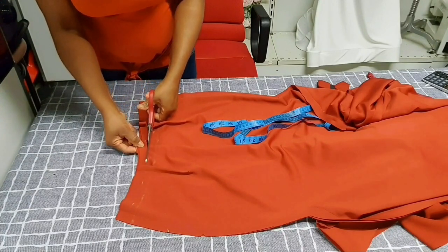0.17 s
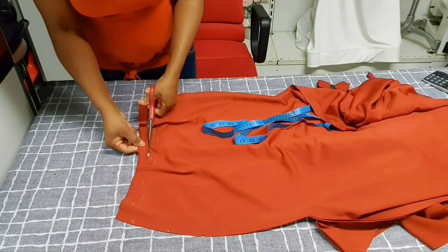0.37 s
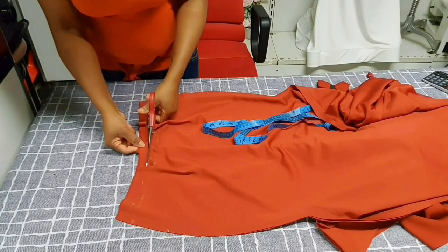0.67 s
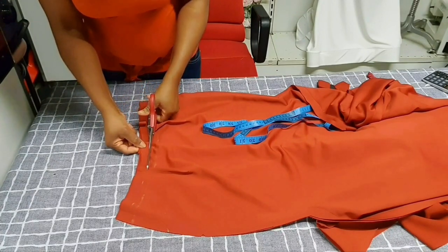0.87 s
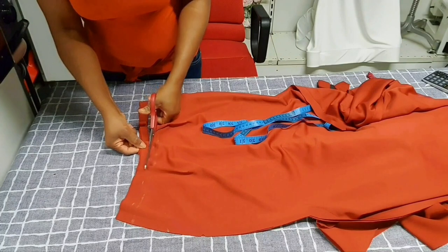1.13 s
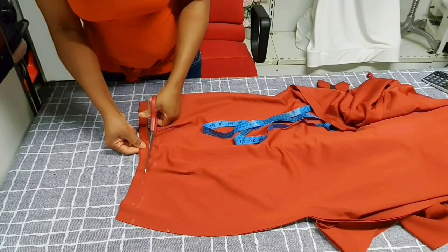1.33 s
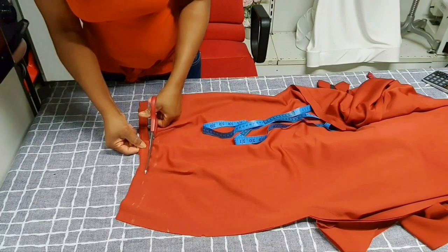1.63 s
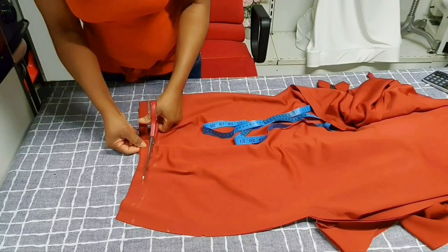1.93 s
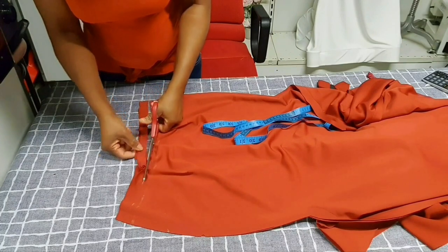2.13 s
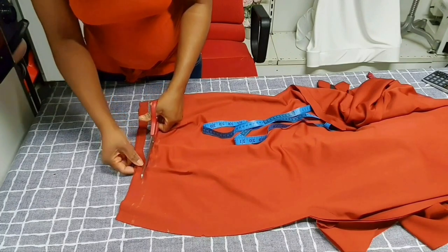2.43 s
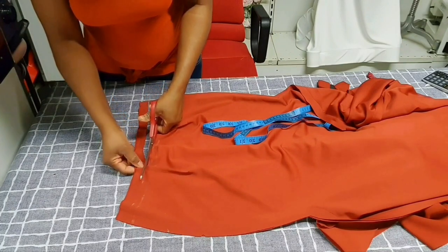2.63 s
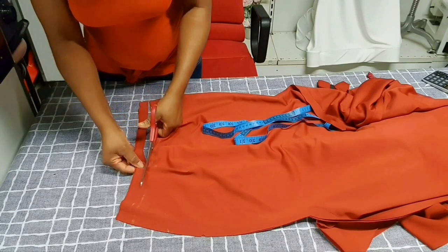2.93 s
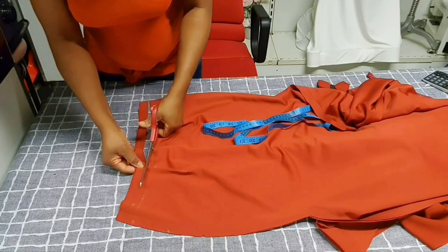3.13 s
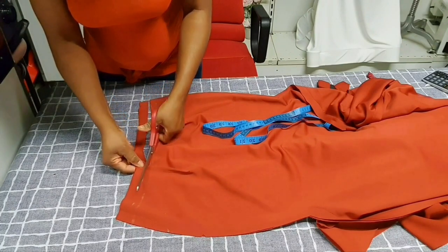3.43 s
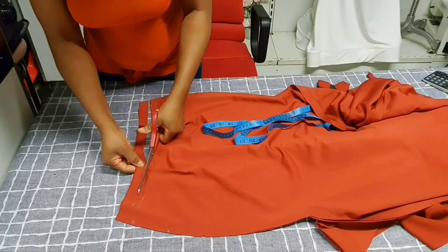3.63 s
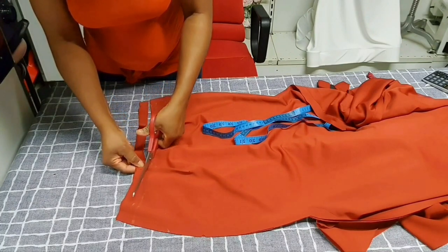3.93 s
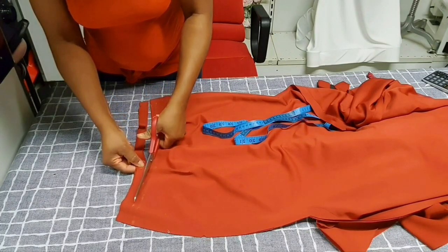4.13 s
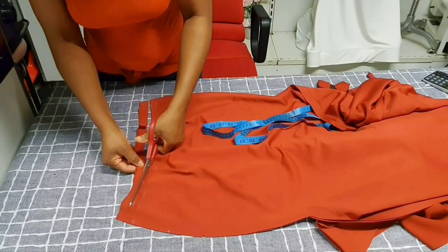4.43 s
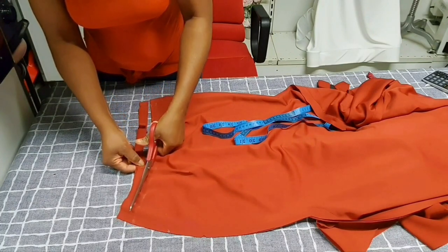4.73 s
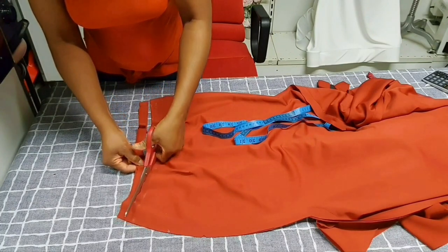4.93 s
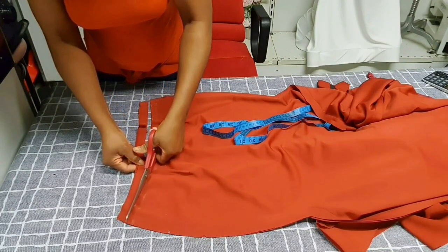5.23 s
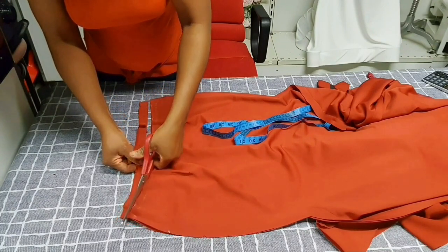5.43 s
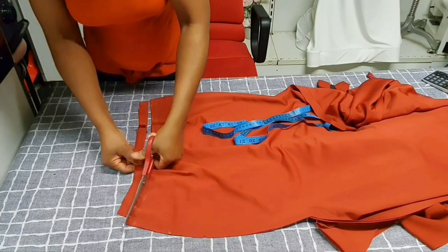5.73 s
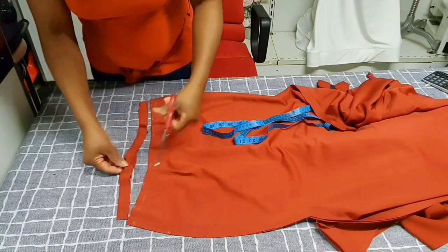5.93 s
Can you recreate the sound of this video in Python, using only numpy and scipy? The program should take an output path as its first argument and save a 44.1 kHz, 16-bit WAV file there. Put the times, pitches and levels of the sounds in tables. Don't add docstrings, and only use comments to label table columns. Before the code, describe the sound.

Scissors cut cloth on a hollow table, heard close in a small quiet room. Each closing stroke is a short crunchy rasp with a low wooden thud. Early snips end in loud handle clacks; between them the blades slide, tap the table and brush fabric. Later strokes come more regularly, rougher and boomier, without the clacks.

```python
import sys
import numpy as np
from scipy import signal
from scipy.fft import rfft, irfft, next_fast_len
from scipy.io import wavfile
from scipy.ndimage import uniform_filter1d, map_coordinates

SR = 44100
rng = np.random.default_rng(int(sys.argv[2]) if len(sys.argv) > 2 else 0)


def inscribe(sig):
    pcm = np.round(np.clip(np.atleast_2d(sig).T, -1, 1) * 32767)
    wavfile.write(sys.argv[1], SR, pcm.astype(np.int16))


def attenuation_scalar(level_db):
    decades = np.asarray(level_db, float) / 20
    return 10 ** decades


N = 268569
T = np.arange(N) / SR

# pitch in Hz, level in dB, t60 in seconds.
TOP_MODES = [(84.5, -32.5, 0.083), (136.5, -2.5, 0.25), (168, 0, 0.088), (200.3, -8.5, 0.19),
             (276.6, 5.5, 0.15), (304.7, -4, 0.3), (339.4, -3, 0.13), (470.2, -7.5, 0.11),
             (529.5, -4, 0.06), (613.6, -3.5, 0.051), (686, -7, 0.046), (773.4, -4, 0.089),
             (875, -4.5, 0.11), (919, -9, 0.097), (979, -1.5, 0.11), (1040, -19, 0.19), (1213, -18.5, 0.29),
             (1306, -11.5, 0.029)]
# pitch in Hz, level in dB, t60 in seconds.
RIM_MODES = [(85, -63, .2), (125, -18, 0.33), (162.4, 7.5, 0.16), (216.6, 1, 0.091), (271.3, 14.5, 0.13),
             (330, 10.5, 0.081), (473.4, -8, 0.18), (496.3, 1.5, 0.072), (588, 1, 0.019),
             (764.3, -1.5, 0.09), (858, 8, 0.043), (962, -7.5, 0.3), (1000, 13, 0.041), (1288, -12.5, 0.28)]
# pitch in Hz, level in dB, t60 in seconds.
BLADE_MODES = [(3350, -10.5, .02), (5050, 15.5, 0.026), (6100, -9.5, 0.013), (7440, 16.5, .015),
               (8200, -16.5, .012), (11700, -2.5, 0.0093), (13800, -4.5, .01)]
# pitch in Hz, level in dB, t60 in seconds.
HANDLE_MODES = [(700, -11, .1), (755, -4, .18), (850, -9, .09), (945, -6, .1), (1020, -2, .15),
                (1060, 0, .1), (1150, -8, .09), (1213, -10, .14), (1275, -10, .12), (1345, -11, .13),
                (1440, -16, .16), (1620, -17, .25), (1860, -21, .14), (2100, -23, .12)]
# frequency in Hz, level in dB per Hz.
SHEAR_COLOUR = [(710, 13.5), (1200, -2.5), (1470, -8.5), (1600, -25.5), (1880, -14.5), (2950, -17),
                (3360, -20), (4530, -13.5), (5990, -3), (8000, -9), (9500, -30), (11600, -22.5),
                (15600, -32.5)]
# time in seconds, pitch in Hz, level in dB.
HUM_COURSE = [(0, 112.5, -66), (.6, 115.6, -80.5), (0.848, 118, -64), (1.1, 115.6, -60.5), (1.3, 113, -57),
              (1.449, 113, -56.5), (1.901, 108, -66.5), (2.399, 107.7, -73), (3.399, 100, -75.5),
              (4.498, 102.3, -93.5), (6.09, 100, -81)]
# frequency in Hz, level in dB.
HUSH_COLOUR = [(20, -26), (40, 0), (65, -15), (110, 8.5), (170, -5.5), (270, -9), (420, -16), (800, -18),
               (1300, -27), (2600, -24), (7800, -32), (8800, -42), (13000, -38.5), (16000, -35)]
# frequency in Hz, left-right likeness from -1 to 1.
LIKENESS = [(60, 0.89), (240, 0.73), (950, 0.15), (3770, -1.2), (15000, -0.29)]
# frequency in Hz, t60 in seconds.
ROOM_T60 = [(150, 0.047), (1000, 0.27), (3000, 0.18), (6000, 0.12), (10000, 0.056)]
# time in seconds, delay in seconds.
PORT_LAG = [(0, 0.00039), (1.5, 0.00033), (2.0, 0.00015), (3.6, 0.00015), (4.2, 0.00021), (4.8, 0.00022),
            (5.2, 0.00018), (6.09, 0.00023)]
# start, loudest and end in seconds, level in dB, centre in Hz.
RUSTLES = [
    (.09, .097, 0.17, -65, 3860),
    (.63, .66, 0.76, -77, 5460),
    (.99, 1.03, 1.12, -63, 3090),
    (1.14, 1.192, 1.252, -57.5, 3670),
    (1.74, 1.747, 1.8, -66.5, 6950),
    (1.78, 1.86, 1.95, -76, 5060),
    (2.76, 2.88, 2.956, -58.5, 6100),
    (2.94, 2.99, 3.4, -77.5, 5000),
    (4.4, 4.424, 4.5, -75, 7546),
]
# start, hardest and end in seconds, first bite in dB, full thrust in dB.
CUTS = [
    (.352, .462, 0.52, -53, -31.5),
    (1.33, 1.444, 1.483, -57.5, -30.5),
    (1.952, 2.045, 2.228, -38.5, -31.5),
    (2.49, 2.625, 2.777, -43, -37),
    (3.475, 3.59, 3.84, -47, -33),
    (4.045, 4.175, 4.3, -52, -36),
    (4.61, 4.73, 4.95, -37, -28),
    (5.11, 5.235, 5.417, -36.5, -28),
    (5.65, 5.74, 5.976, -38, -27.5),
]
# scrape in dB, edge in relative dB, sizzle in relative dB,
# low band in Hz, high band in Hz.
GRIPS = [(-38, -14, -8.5, 3650, 5550), (-43, 1, -6, 3450, 6400), (-38, -5, -6.5, 3600, 2000),
         (-45, -15, -5.5, 3360, 5000), (-43, -23, -10.5, 3340, 5400), (-38.5, -25, -5.5, 3330, 6600),
         (-35, 0.5, -7.5, 3450, 9700), (-34, 1.5, -5, 3250, 5700), (-35, 2.5, -6, 3230, 5600)]
# contact, engaged and last thread in seconds, engaged level in dB, last level in dB.
SHEARING = [(.345, .376, 0.46, -62.5, -49), (1.31, 1.443, 1.446, -64, -60.5),
            (1.942, 1.987, 2.09, -56, -62.5), (2.513, 2.516, 2.64, -62.5, -55.5),
            (3.491, 3.527, 3.666, -53, -54.5), (4.065, 4.109, 4.172, -51.5, -54),
            (4.597, 4.62, 4.77, -60.5, -60), (5.115, 5.151, 5.255, -58, -60.5),
            (5.649, 5.674, 5.755, -58, -57.5)]
# start, hardest and end in seconds, thrust in dB, scrape in dB.
SLIDES = [(0, .036, 0.097, -56, -92), (.1, .14, 0.22, -66, -64), (.69, .72, 0.82, -50, -70),
          (1.1, 1.3, 1.28, -51.5, -65), (1.76, 1.8, 1.84, -46.5, -66), (2.23, 2.3, 2.45, -42, -58.5),
          (2.97, 3.0, 3.52, -55, -76.5), (3.15, 3.34, 3.36, -49.5, -74.5), (3.79, 3.86, 4.0, -48, -58),
          (4.39, 4.43, 4.53, -44, -53), (4.84, 4.96, 5.06, -46, -52.5), (5.34, 5.43, 5.58, -47, -53.5),
          (5.88, 5.99, 6.04, -47, -52.5)]
# time in seconds, thud, ring, crack and tick in dB.
SNAPS = [(.47, -22.5, -23.5, -31, -42), (1.429, -33.5, -56.5, -67, -68.5), (1.488, -21, -32, -33, -45),
         (1.967, -78, -67, -69, -72), (2.014, -33, -39, -71, -62.5), (2.046, -26, -31, -56, -60.5),
         (2.591, -67, -35, -60.5, -61), (2.616, -30, -31, -62, -40), (2.644, -27.5, -42, -74, -61),
         (3.492, -40.5, -54, -80, -76), (3.588, -18, -25.5, -22.5, -53.5), (4.063, -46.5, -50, -59, -72),
         (4.175, -29, -33.5, -62, -44.5), (4.645, -52, -34, -56, -61.5), (4.751, -27.5, -32, -35.5, -54),
         (5.231, -26, -30.5, -33.5, -42.5), (5.679, -37, -52, -53, -72)]
# time in seconds, thud, ring, crack and tick in dB.
TAPS = [
    (.096, -32, -60, -50, -53),
    (.128, -52, -48.5, -78, -80),
    (.648, -33, -46, -62, -59),
    (.676, -37.5, -47, -74, -56.5),
    (1.747, -39.5, -46, -51.5, -46.5),
    (2.261, -54.5, -63, -79, -77),
    (2.878, -67, -68, -86, -61),
    (2.952, -28.5, -51.5, -55, -59.5),
    (3.843, -46, -50, -80, -83.5),
    (4.41, -44.5, -52.5, -88, -85),
]
# time in seconds, level in dB.
CLOSINGS = [
    (.096, -31),
    (.469, -5),
    (.676, -36),
    (1.488, -7),
    (1.747, -35),
    (2.617, -19),
    (2.952, -40),
    (3.588, -1),
]

UPPER_HZ, DAMPED_S = 820, .14
BITE_S, SPENT_DB = 0.027, -47
SCRAPE_SWELL = 1.08
LOW_GLIDE, HIGH_GLIDE, SCRAPE_GLIDE = -.07, -.06, .25
SCRAPE_HZ, SLIDE_HZ, SLIDE_ENDS_DB = 605, 535, -25
SOFT_HZ, HARD_HZ, SOFT_DB, HARD_DB = 470, 1080, -31, -30
EDGE_GAIN_DB, SIZZLE_GAIN_DB = 16, -1
CONTACT_DB, LET_GO_S, LET_GO_DB = -28.5, 0.03, -33.5
WANDER = .03
RUSTLE_RISE_DB, RUSTLE_FALL_DB = -17, -21.5
HUSH_DB = -65
AIRBORNE_HZ = 600


def table():
    s, thud_db, ring_db, crack_db, _ = knocks()
    force = jerks(600, 2.16)

    thrust = strokes(np.array(CUTS)[:, 4], 0.83) + swells(SLIDES, 3, SLIDE_ENDS_DB, SLIDE_ENDS_DB)
    cushion = signal.windows.hann(170)
    low = force * thrust + blows(thud_db + 29.0)
    low = signal.oaconvolve(low, cushion / cushion.sum())[50:N + 50]

    cut = strokes(np.array(GRIPS)[:, 0], SCRAPE_SWELL)
    slide = swells(SLIDES, 4, SLIDE_ENDS_DB, SLIDE_ENDS_DB)
    scrape = cut + slide
    grit = force * scrape
    rattle = burst(.009)
    knock = signal.oaconvolve(blows(ring_db + 15.5), rattle)[:N]

    latest = np.maximum(np.searchsorted(s, T + .002) - 1, 0)
    knock_hz = np.interp(ring_db, [SOFT_DB, HARD_DB], [SOFT_HZ, HARD_HZ])
    cut_hz = glide(np.full(len(CUTS), SCRAPE_HZ), SCRAPE_GLIDE)
    grit = 0.15 * grit + attenuation_scalar(1.5) * sweep(grit, np.where(cut > slide, cut_hz, SLIDE_HZ), 140)
    knock = 0.55 * knock + attenuation_scalar(1.5) * sweep(knock, knock_hz[latest], 220)

    hard = (scrape / attenuation_scalar(-42)) ** .5
    firm = attenuation_scalar(0.16 * (ring_db[latest] + 20.0))
    middle = grit + knock
    high = hard * grit + firm * knock
    near = np.clip((T - 3.7) / 0.19, 0, 1)
    out = 0
    for share, modes in ((np.sqrt(1 - near), TOP_MODES), (np.sqrt(near), RIM_MODES)):
        damped = [(hz, db, min(t60, DAMPED_S)) for hz, db, t60 in modes if hz >= UPPER_HZ]
        out += ring(low * share, [m for m in modes if m[0] < 400])
        out += ring(middle * share, [m for m in modes if 400 <= m[0] < UPPER_HZ])
        out += attenuation_scalar(-2.0) * ring(high * share, damped)

    crack = signal.oaconvolve(blows(crack_db + 20.5), rattle)[:N]
    out += signal.oaconvolve(attenuation_scalar(-15.0) * grit_force(force, scrape, hard) + crack, crowd())[:N]
    return signal.sosfilt(signal.butter(6, 88 / (SR / 2), "high", output="sos"), out)


def grit_force(force, scrape, hard):
    return force * scrape * hard


def crowd():
    hz, t = np.sort(rng.uniform(850, 3100, 130))[:, None], T[:SR // 4]
    t60 = 0.11 * (hz / 1000) ** -.35
    fall_db = -10.0 * np.log2(hz / 1000) - 60 * t / t60
    waves = np.sin(2 * np.pi * (hz * t + rng.random(hz.shape)))
    body = (attenuation_scalar(fall_db) * waves).sum(0) * np.minimum(t / .001, 1)
    return body / np.linalg.norm(body)


def scissors():
    _, edge_db, sizzle_db, low_hz, high_hz = np.transpose(GRIPS)
    rub = patchy(rng.standard_normal(N) + .5 * jerks(1800, 4), 3.4)
    clumps = evened(uniform_filter1d(rng.standard_normal(N), size=450))
    rub = evened(rub * attenuation_scalar(3.0 * clumps))

    shaped = colour(rub, lambda f: attenuation_scalar(read(SHEAR_COLOUR, f)) / (1 + (1800 / (f + 1)) ** 4))
    low = colour(shaped, lambda f: 1 / (1 + (f / 4600) ** 10))
    wide = colour(shaped, lambda f: 1 / (1 + (f / 9600) ** 10))
    body, edge, air = evened(low), evened(wide - low), evened(shaped - wide)

    stray = uniform_filter1d(rng.standard_normal((2, N)), size=1200)
    stray = evened(uniform_filter1d(stray, size=1200))
    bands = np.array([glide(low_hz, LOW_GLIDE), glide(high_hz, HIGH_GLIDE)])
    low_band, high_band = bands * (1 + WANDER * stray)
    body = body + attenuation_scalar(-3.5) * evened(sweep(sweep(rub, low_band, 520), low_band, 520))
    edge = edge + attenuation_scalar(-2.5) * evened(sweep(sweep(rub, high_band, 750), high_band, 750))

    cut = shearing(0 * edge_db, 0) * body + attenuation_scalar(-6.5) * shearing(edge_db + 6.5, EDGE_GAIN_DB) * edge
    return attenuation_scalar(2.0) * cut + attenuation_scalar(1.5) * shearing(sizzle_db, SIZZLE_GAIN_DB) * air


def claps():
    train = np.zeros(N)
    for s, db in CLOSINGS:
        train[round(s * SR):][:1024] += attenuation_scalar(db) * burst(.016)
    return ring(train, HANDLE_MODES)


def ticks():
    tick = blows(knocks()[4] + 12)
    snap = signal.oaconvolve(tick, burst(0.028))[:N]
    snap = colour(snap, lambda f: attenuation_scalar(read(SHEAR_COLOUR, f) / 2) * (f > 3000))
    return attenuation_scalar(12.0) * snap + attenuation_scalar(-14.0) * ring(tick, BLADE_MODES)


def cloth():
    rub = patchy(rng.standard_normal(N), 2.0)
    hz = np.interp(T, *np.array(RUSTLES)[:, [1, 4]].T)
    band = evened(sweep(sweep(rub, hz, 2900), hz, 2900))
    sheen = colour(rub, lambda f: attenuation_scalar(read(SHEAR_COLOUR, f) / 2) / (1 + (hz.min() / (f + 1)) ** 6))
    level = swells(RUSTLES, 3, RUSTLE_RISE_DB, RUSTLE_FALL_DB)
    return level * (band + evened(sheen)) * attenuation_scalar(-4.0)


def hum():
    s, hz, db = np.transpose(HUM_COURSE)
    drift = uniform_filter1d(uniform_filter1d(rng.standard_normal(N), 3000), 3000)
    level = attenuation_scalar(np.interp(T, s, db)) * attenuation_scalar(1.5 * evened(drift))
    return np.sqrt(2) * level * np.sin(2 * np.pi * np.cumsum(np.interp(T, s, hz)) / SR)


def hush():
    a, b = rng.standard_normal((2, N))
    same = lambda f: np.clip(read(LIKENESS, f), 0, 1)
    right = colour(a, same) + colour(b, lambda f: np.sqrt(1 - same(f) ** 2))
    pair = colour(np.array([a, right]), lambda f: attenuation_scalar(read(HUSH_COLOUR, f)))
    return attenuation_scalar(HUSH_DB - 2.0) * evened(pair)


def room(x):
    taps = np.zeros((2, SR // 2))
    jitter = rng.integers(0, 20, (2, (SR // 2 - 151) // 20))
    at = np.arange(150, SR // 2 - 20, 20) + jitter
    np.put_along_axis(taps, at, rng.choice([-1., 1.], at.shape), 1)
    hz, t, z = signal.stft(taps, SR, nperseg=256)
    tail = signal.istft(z * attenuation_scalar(-60 * t / read(ROOM_T60, hz)[:, None]), SR, nperseg=256)[1]
    tail = signal.lfilter(*signal.butter(2, 600 / (SR / 2), "high"), tail)
    return signal.fftconvolve(x[None], tail / np.linalg.norm(tail[0]), axes=1)[:, :N]


def ports(x, share):
    late = np.arange(N) - share * SR * np.interp(T, *np.transpose(PORT_LAG))
    return np.array([x, map_coordinates(x, [late], order=5)])


def knocks():
    return np.transpose(sorted(list(SNAPS) + list(TAPS)))


def blows(db):
    train = np.zeros(N)
    train[(knocks()[0] * SR).astype(int)] = attenuation_scalar(db)
    return train


def burst(length_s):
    fall = attenuation_scalar(-60 * T[:1024] / length_s)
    z = rfft(rng.standard_normal(1024) * fall)
    shape = irfft(z / abs(z)) * np.sqrt(fall) * np.minimum(T[:1024] / .0005, 1)
    return shape / np.linalg.norm(shape)


def jerks(per_s, spread_db):
    size = attenuation_scalar(spread_db * np.minimum(rng.exponential(1, N), 4)) * rng.choice([-1., 1.], N)
    return evened(size * (rng.random(N) < per_s / SR))


def patchy(x, depth_db):
    z = signal.stft(x, nperseg=256, noverlap=192)[2]
    field = uniform_filter1d(rng.standard_normal(z.shape[::-1]), size=16, axis=0)
    field = evened(uniform_filter1d(field, size=4, axis=1)).T
    return evened(signal.istft(z * attenuation_scalar(depth_db * field), nperseg=256, noverlap=192)[1][:N])


def ring(x, modes):
    t = T[:SR // 2]
    body = sum(attenuation_scalar(db - 60 * t / t60) * np.sin(2 * np.pi * hz * t) for hz, db, t60 in modes)
    return signal.oaconvolve(x, body / np.linalg.norm(body))[:N]


def sweep(x, hz, width_hz):
    turn = np.exp(2j * np.pi * np.cumsum(hz) / SR)
    r = np.exp(-np.pi * width_hz / SR)
    return 2 * (turn * signal.lfilter([1 - r], [1, -r], x / turn)).real


def shaped_by(times, db):
    on, gain = (T >= times[0]) & (T < times[-1]), np.zeros(N)
    fade = signal.windows.tukey(on.sum(), min(1, 300 / on.sum()))
    gain[on] = attenuation_scalar(np.interp(T[on], times, db)) * fade
    return gain


def strokes(top_db, swell):
    out = 0
    for (a, b, c, bite, full), db in zip(CUTS, top_db):
        course = np.array([bite - full - 15, bite - full, 0, SPENT_DB])
        out = out + shaped_by([a, a + BITE_S, b, c], db + swell * course)
    return out


def swells(rows, column, rise_db, fall_db):
    return sum(shaped_by(r[:3], r[column] + np.array([rise_db, 0, fall_db])) for r in rows)


def shearing(extra_db, tip_db):
    out = 0
    for (a, b, c, first, last), db in zip(SHEARING, extra_db):
        course = np.array([first + CONTACT_DB - tip_db, first - tip_db, last, last + LET_GO_DB])
        out = out + shaped_by([a, b, c, c + LET_GO_S], db + course)
    return out


def glide(hz, share):
    s = np.array(CUTS)[:, [0, 2]].ravel()
    return np.interp(T, s, (np.asarray(hz)[:, None] * [1 - share / 2, 1 + share / 2]).ravel())


def colour(x, gain):
    size = next_fast_len(N)
    return irfft(rfft(x, size) * gain(np.fft.rfftfreq(size, 1 / SR)), size)[..., :N]


def read(points, hz):
    f, value = np.transpose(points)
    return np.interp(np.log(hz + 1), np.log(f + 1), value)


def evened(x):
    return x / np.sqrt(np.mean(x ** 2) + 1e-20)


def scene():
    wood, steel, clicks, slam = table(), scissors() + cloth(), ticks(), claps()
    upper = colour(wood, lambda f: 1 - 1 / (1 + (f / AIRBORNE_HZ) ** 4))
    direct = ports(wood - upper, 0.85) + ports(upper, 0.47)
    direct += ports(steel + clicks, 0.74) * attenuation_scalar([[.4], [-.4]])
    echoes = room(attenuation_scalar(-8.0) * wood + attenuation_scalar(-3) * steel + attenuation_scalar(-15) * clicks)
    handles = ports(slam, 0.46) + attenuation_scalar(-6.5) * room(slam)
    return direct + echoes + handles + hum() + hush()


def low_pass(x):
    return signal.sosfilt(signal.butter(12, 15710, fs=SR, output="sos"), x)


def record(dry):
    return low_pass(dry)


dry = scene()
out = record(dry)
inscribe(out)
```